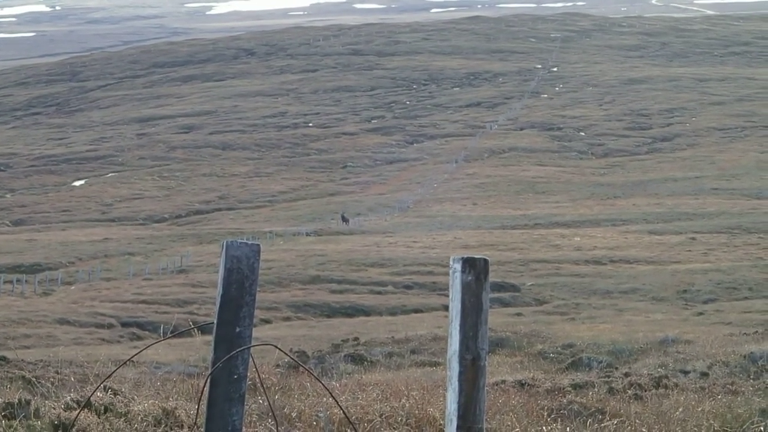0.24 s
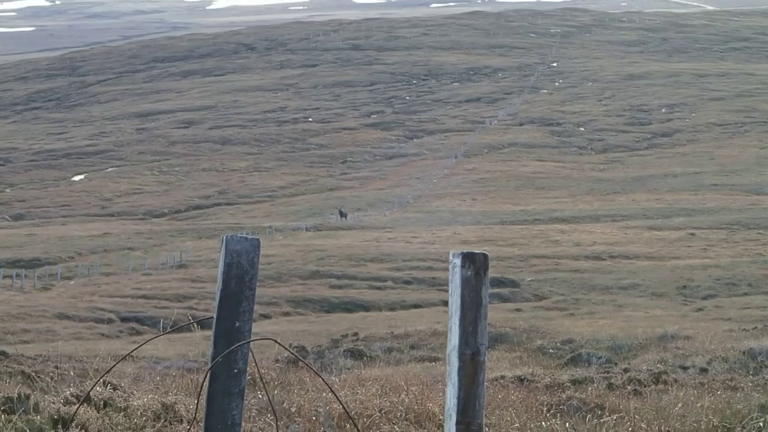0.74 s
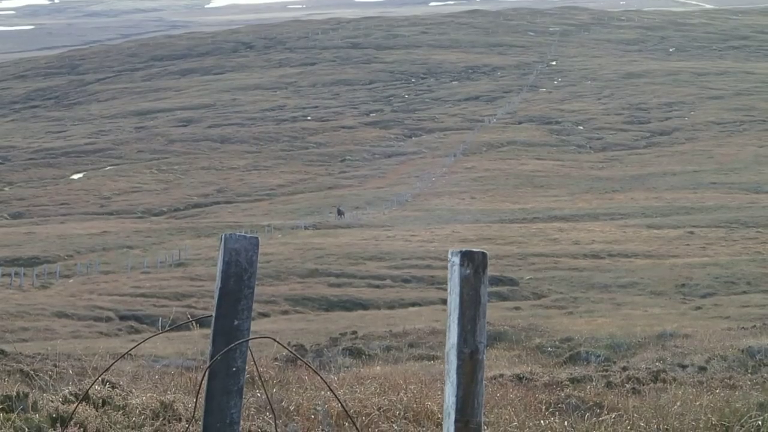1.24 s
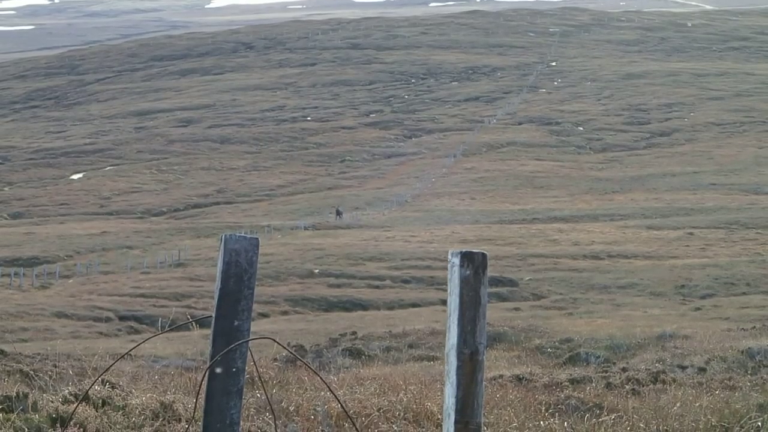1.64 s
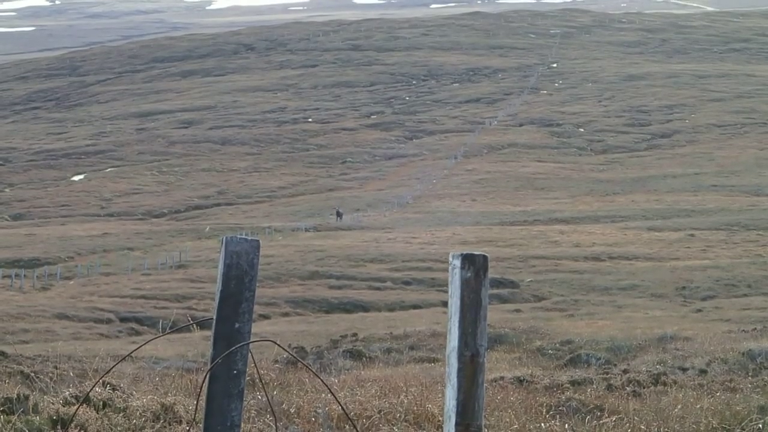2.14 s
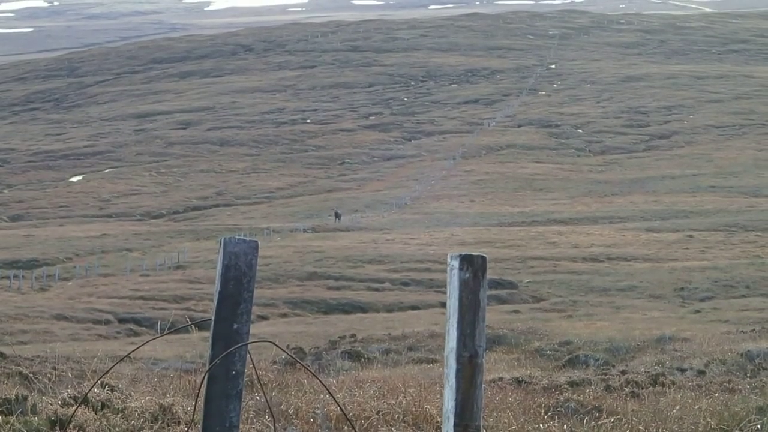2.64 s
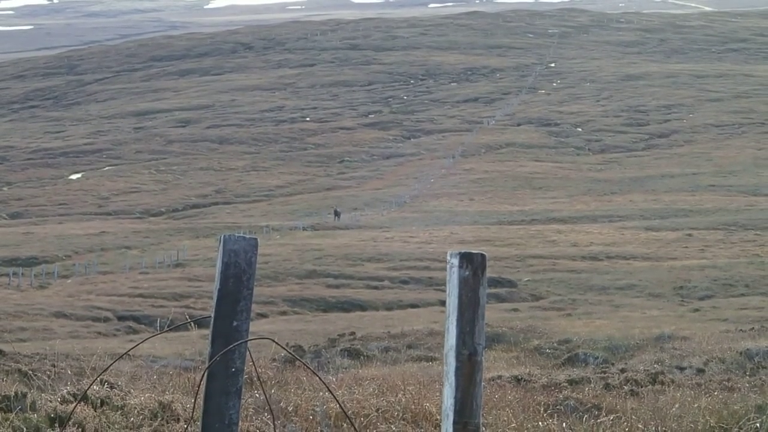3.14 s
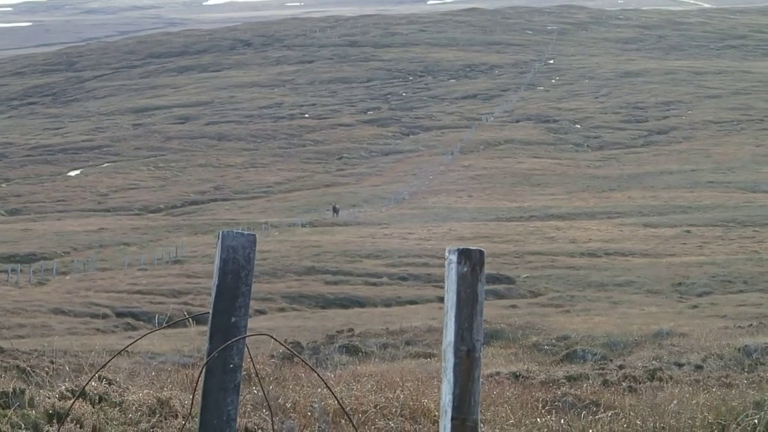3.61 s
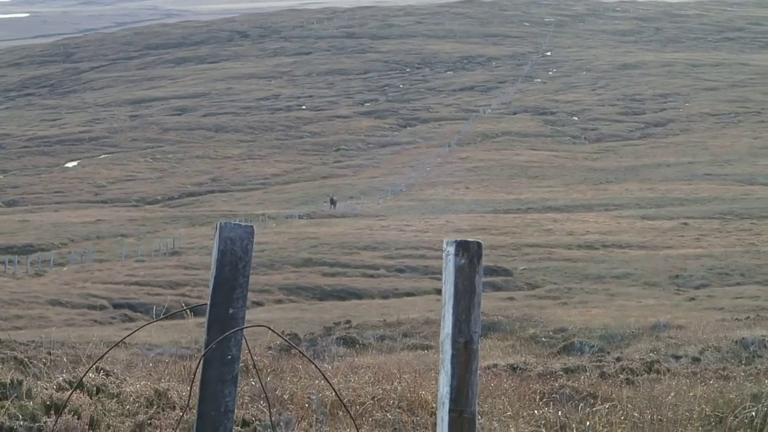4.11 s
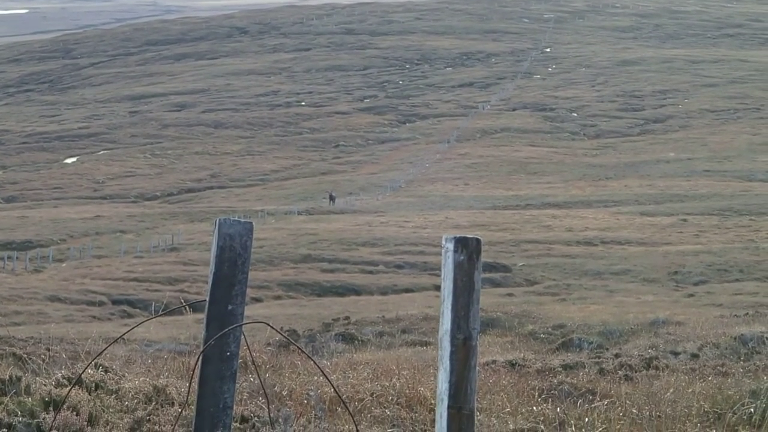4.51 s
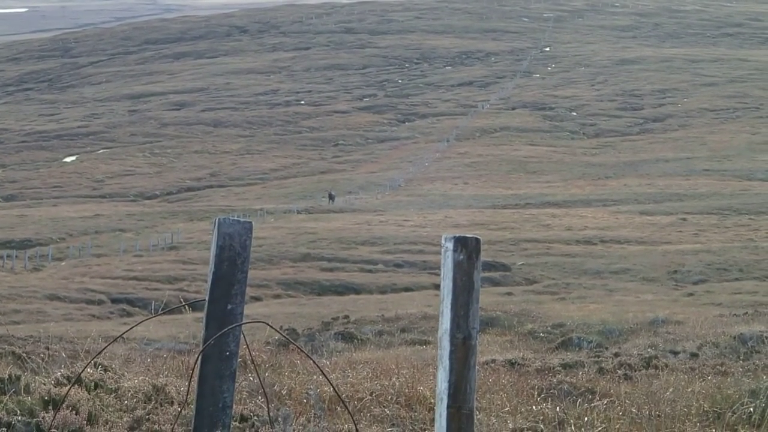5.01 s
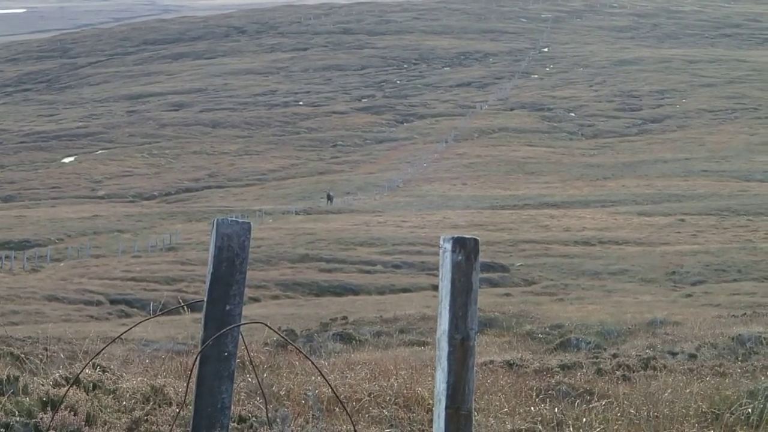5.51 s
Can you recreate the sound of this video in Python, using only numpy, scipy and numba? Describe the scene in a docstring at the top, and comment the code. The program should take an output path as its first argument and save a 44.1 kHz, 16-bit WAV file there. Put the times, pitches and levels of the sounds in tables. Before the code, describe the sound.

A distant red deer stag gives two long, hoarse, hollow roars across open moorland, over steady wide hiss and faint dry-grass rustle.

```python
"""A red deer stag roars far off across open moorland, at once and for 3.7 s, while the larynx slides down.
Three arches of pitch on one breath end as the larynx is let go; a second roar at 4.1 s leaps up, then falls.
Pulses from the vocal folds drive throat resonances; heather scatters the sound, a hillside echoes it faintly.
Throughout lie filtered-noise air and microphone hiss, which flickers, and a dry-grass rustle with four gusts."""
import sys
import numpy as np
from scipy import signal
from scipy.fft import rfft, irfft
from scipy.io import wavfile
from scipy.ndimage import uniform_filter1d
from numba import njit

SR = 44100
rng = np.random.default_rng(int(sys.argv[2]) if len(sys.argv) > 2 else 0)


def to_wav(sig):
    """Store sig (one row per channel, or 1-D mono) as 16-bit WAV at the path in sys.argv[1].

    Samples outside -1..1 are clipped; the rate is SR.
    """
    pcm = np.clip(np.atleast_2d(sig), -1, 1) * 32767
    pcm = np.round(pcm).astype(np.int16)
    wavfile.write(sys.argv[1], SR, pcm.T)  # frames by channels


N = 254016

# The two roars. Each row: start in seconds, end in seconds, effort in dB, extra effort at the outset in dB,
# mouth resonance at the outset in dB, larynx drop in octaves, time of the drop in seconds,
# its abruptness as a power, time of the larynx's release in seconds.
ROARS = [(0, 3.715, -1.13, -4, -1, 0.478, 0.472, 1.47, 0.058),
         (4.126, 5.76, 2.5, -2.4, 9, 0.3804, 0.3, 0.97, 0.27)]
# Vocal-fold pitch in the first roar: three arches on one breath. Each row: time in seconds, pitch in Hz.
FIRST_PITCH = [(0.0, 73.1), (0.07, 71.85), (0.15, 79.2), (0.24, 92.9), (0.27, 95.1), (0.34, 99.4),
               (0.42, 101.6), (0.49, 103.3), (0.58, 112.6), (0.8, 118.6), (0.95, 125.5), (0.99, 126),
               (1.11, 119.4), (1.19, 118.8), (1.29, 109), (1.38, 106.5), (1.51, 106.8), (1.72, 111.4),
               (1.81, 110.7), (1.99, 109.4), (2.14, 113.1), (2.23, 125.8), (2.37, 129.8), (2.62, 129.6),
               (2.68, 121.4), (2.74, 109.4), (3.61, 107), (3.64, 104.5), (3.67, 99.6), (3.72, 86.2)]
# Vocal-fold pitch in the second roar: a leap and a stepwise fall. Each row: time in seconds, pitch in Hz.
SECOND_PITCH = [(4.12, 69.9), (4.156, 89.7), (4.182, 106.0), (4.196, 111.9), (4.242, 117.4), (4.366, 127.1),
                (4.462, 126.8), (4.782, 124.3), (4.942, 120), (5.07, 110.2), (5.224, 108.8), (5.344, 102.2),
                (5.458, 102.1), (5.562, 97.7), (5.76, 95.24)]
# Surges and lulls, each with the mouth reshaped. Each row: time in seconds, half length in seconds,
# effort in dB, mouth resonance in dB, mouth resonance in Hz.
SURGES = [(.17, .07, 3.5, 1, 2100), (.31, 0.038, 3, 3, 1870), (.5, .14, -1.3, 1, 2124),
          (1.0, 0.18, -1, -1.5, 2220), (1.402, 0.13, 0.5, -2.5, 2250), (1.734, .07, 2.5, -0.5, 2070),
          (2.083, 0.042, 1.5, 2.5, 2015), (2.217, .03, 0.5, -4, 2070), (2.451, 0.17, 2.5, .5, 2045),
          (2.691, 0.027, 1, 1.5, 2107), (3.053, 0.4, 2.1, -3, 2060), (3.57, .11, 0.7, 4, 2150),
          (3.69, 0.039, 2.5, 2, 1991), (4.197, .04, 1.5, 1.5, 2010), (4.4, 0.029, 0.5, -1, 2068),
          (4.83, .04, 0, 2, 2263), (5.13, 0.13, 0.2, -3, 2100), (5.46, .1, 0.9, -1.8, 2137),
          (5.681, .12, -1, 4, 2170)]
# The larynx eases up once between two arches. The row: time in seconds, half length in seconds, octaves.
LARYNX_EASE = (1.814, 0.2, 0.089)
# Throat resonances, one list per register (chest, hollow, middle, upper, top). Each row: centre at rest in Hz,
# width of each of two passes in Hz, level within the register in dB, share of the larynx shift followed.
THROAT_MODES = [
    [(539.2, 61, -1.5, 0.65), (706.8, 128.5, 1.5, 0.74)],
    [(977, 74, 4.5, 1.256)],
    [(1330.6, 136.7, -2, 0.46), (1599, 45, -7.5, 1.035)],
    [(1883, 72.7, -0.5, 0.7), (2115.7, 74.6, -10, 0.37), (2374.5, 137, -4, 0.029)],
    [(2702.5, 105, -4, 0.13), (3018, 86, -18.5, -0.026), (3270, 174, -16, -0.12), (3840, 100, -20, 0.018),
     (5900, 1500, -39, 0)],
]
# How each register answers. Each row: base level in dB, dB per dB of effort,
# dB per octave that the larynx stands above rest, dB per dB of mouth resonance.
REGISTERS = [(-32, .7, 4, -0.04), (-30.5, 0.18, -28, -0.56), (-30, 0.51, -20.5, -0.19),
             (-31.5, 1.0, -24, 0.09), (-30, 1.94, -18, -0.6)]
# The voice leans right. Rows: left gain in dB, right gain in dB.
BEARING_DB = [(-0.03,), (2,)]
# Light gusts stir the dry grass. Each row: time in seconds, half length in seconds, rise above the calm in dB.
GUSTS = [(1.101, .4, 6), (2.12, .3, 10.5), (3.5, .35, 9), (4.598, 0.26, 9.5)]
# High rustle spectrum. Each row: frequency in Hz, relative density in dB per Hz.
RUSTLE_SPECTRUM = [(3500, -39), (4900, 4), (5400, 6), (6300, 4), (6700, -37), (10000, -33)]
# Hiss spectrum common to both sides. Each row: frequency in Hz, relative density in dB per Hz.
HISS_MID_SPECTRUM = [(30, -39), (60, -18.5), (110, -7.5), (220, -.5), (450, 1.5), (1000, -1), (2000, -3.5),
                     (3300, -8), (4000, -9.5), (5200, -8.5), (7500, -12), (15500, -14)]
# Hiss spectrum opposed between sides. Each row: frequency in Hz, relative density in dB per Hz.
HISS_SIDE_SPECTRUM = [(30, -41), (60, -23), (110, -10.5), (220, -4), (450, -1.5), (1000, -5), (2000, -7.5),
                      (3300, -10), (4000, -26.5), (5200, -4.5), (7500, -15.5), (15500, -16.5)]

EASY_PITCH_HZ, EFFORT_DB_PER_OCTAVE = 110.83, 8.2   # a harder push is both higher and louder
LARYNX_REST_OCTAVES, LARYNX_RELEASE_OCTAVES = -0.0078, 0.091   # fully retracted; rise as a roar ends
MOUTH_HZ = 2115
CLEAR_ROUGH, ONSET_ROUGH, MAX_ROUGH = 0.0457, 0.025, 0.13   # roughness 0-1: base, added at the outset, ceiling
SLACK_ROUGH_PER_OCTAVE, GLIDE_ROUGH_S = 0.12, 0.016   # below the easy pitch; per octave a second of glide
CALM_RUSTLE_DB = -76
HISS_MID_DB, HISS_SIDE_DB = -54.5, -54.5   # before lean and flicker
HILL_T60_S = 4
CUTOFF_HZ = 15750


def stag(mouth_gain=3.44, mouth_width_hz=126):
    """The folds drive the throat; effort brightens it; the mouth lifts one band and mostly dulls the others."""
    pitch_hz, = in_time([*FIRST_PITCH, *SECOND_PITCH])
    octaves = np.log2(pitch_hz / EASY_PITCH_HZ)
    roaring, roar_db, roar_mouth_db, larynx_octaves, outset = roar_course()
    surge_db, surge_mouth_db, mouth_shift_hz = surges()

    ease_s, ease_half_s, ease_octaves = LARYNX_EASE
    larynx_octaves = larynx_octaves + ease_octaves * bump(ease_s, ease_half_s)
    effort_db = roar_db + surge_db + EFFORT_DB_PER_OCTAVE * octaves
    mouth_db = roar_mouth_db + surge_mouth_db
    register_db = [db + by_effort * effort_db + by_larynx * larynx_octaves + by_mouth * mouth_db
                   for db, by_effort, by_larynx, by_mouth in REGISTERS]

    gate = uniform_filter1d(roaring, size=600)   # samples
    source = gate * vocal_folds(pitch_hz, hoarseness(octaves, outset))
    voice = throat(source, larynx_octaves, register_db)
    mouth = resonance(voice, MOUTH_HZ + mouth_shift_hz, mouth_width_hz)
    return voice + mouth_gain * from_db(mouth_db) * mouth


def roar_course():
    """The larynx slides down, then is let go: gate, effort dB, mouth dB, larynx octaves, outset 0-1."""
    t = np.arange(N) / SR
    course = np.zeros((5, N))
    for start_s, end_s, db, outset_db, mouth_db, drop_octaves, drop_s, power, release_s in ROARS:
        outset = np.exp(-(np.maximum(t - start_s, 0) / drop_s) ** power)
        release = np.exp(-np.maximum(end_s - t, 0) / release_s)
        larynx = LARYNX_REST_OCTAVES + drop_octaves * outset + LARYNX_RELEASE_OCTAVES * release
        roar = [t <= end_s, db + outset_db * outset, mouth_db * outset, larynx, outset]
        course = np.where(t >= start_s, roar, course)
    return course


def surges():
    """Surges and lulls shift effort (dB), mouth resonance (dB) and its centre (Hz)."""
    return sum(np.outer([db, mouth_db, hz - MOUTH_HZ], bump(s, half_s))
               for s, half_s, db, mouth_db, hz in SURGES)


def hoarseness(octaves, outset):
    """The folds run rough when slack, when the pitch slides fast and before the roar has settled."""
    glide = uniform_filter1d(np.abs(np.gradient(octaves)) * SR, size=1500)   # octaves per second
    slack = np.maximum(-octaves, 0)
    rough = CLEAR_ROUGH + SLACK_ROUGH_PER_OCTAVE * slack + GLIDE_ROUGH_S * glide + ONSET_ROUGH * outset
    return np.clip(rough, 0, MAX_ROUGH)


def vocal_folds(pitch_hz, rough, jitter=0.054, waver=0.001, shimmer_db=9):
    """One sharp closure a cycle plus a puff of turbulence; hoarseness unsettles timing and strength."""
    unsteady_hz = pitch_hz * (1 + jitter * rough * drift(48.4) + waver * drift(15.2))
    cycles = np.cumsum(unsteady_hz) / SR
    closed = np.flatnonzero(np.diff(np.floor(cycles)) > 0)
    late = 1 - cycles[closed + 1] % 1 / np.diff(cycles)[closed]   # closures fall between samples
    pulses = np.zeros(N)
    pulses[closed], pulses[closed + 1] = 1 - late, late
    pulses = pulses * np.sqrt(SR / pitch_hz)   # the same power at any pitch
    puffs = rms_one(rng.standard_normal(N) * (1 + np.cos(2 * np.pi * cycles)) ** 2)
    rasp = 0.55 * rough * puffs
    return pulses * from_db(shimmer_db * rough * drift(44)) + rasp


def throat(source, larynx_octaves, register_db, flutter_db=2.02):
    """Steep resonances with dark valleys between; each follows its share of larynx shift and flutters in level."""
    out, sign = 0, 1
    for modes, extra_db in zip(THROAT_MODES, register_db):
        for rest_hz, width_hz, db, share in modes:
            hz = rest_hz * 2 ** (share * larynx_octaves)
            ringing = resonance(resonance(source, hz, width_hz), hz, width_hz)
            level_db = db + extra_db + flutter_db * drift(6)
            out = out + sign * from_db(level_db) * ringing
            sign = -sign   # neighbouring modes of a tube swing in opposite senses at its end
    return out


def dispersed(x, phase_turns=((2150, 420), (2650, 420))):
    """The far path delays the bright bands (centre Hz, width Hz) a little, which blunts each pulse."""
    for hz, width_hz in phase_turns:
        x = x - 2 * resonance(x, np.full(N, hz), width_hz)   # all-pass
    return x


def over_heather(x, low_cut_hz=520, order=12):
    """Grazing over soft ground cancels the low harmonics."""
    return signal.sosfilt(signal.butter(order, low_cut_hz, "high", fs=SR, output="sos"), x)


def moor(voice, near_db=-18, near_t60_s=0.42, far_db=-19.0, far_cut_hz=1300):
    """A short scatter off the heather and a long echo off the hill, dulled by a low-pass."""
    t = np.arange(2 * SR) / SR
    near, far = [rng.standard_normal(len(t)) * from_db(-60 * t / t60_s) for t60_s in (near_t60_s, HILL_T60_S)]
    near = from_db(near_db) * near / np.linalg.norm(near)
    far = from_db(far_db) * far / np.linalg.norm(far)   # level before the low-pass
    dull_far = signal.sosfilt(signal.butter(2, far_cut_hz, fs=SR, output="sos"), far)
    return voice + signal.fftconvolve(voice, near + dull_far)[:N]


def rustle(unsteady_db=3.5):
    """Dry stalks brush together in light air: high noise of unsteady level, raised by gusts."""
    level_db = CALM_RUSTLE_DB + sum(db * bump(s, half_s) for s, half_s, db in GUSTS)
    return from_db(level_db + unsteady_db * drift(32)) * coloured_noise(RUSTLE_SPECTRUM)


def hiss():
    """Steady air and microphone noise from independent mid and side parts, so it sounds wide."""
    mid = from_db(HISS_MID_DB) * coloured_noise(HISS_MID_SPECTRUM)
    side = from_db(HISS_SIDE_DB) * coloured_noise(HISS_SIDE_SPECTRUM)
    return np.array([mid + side, mid - side])


def flicker(depth_db=1.26, duty=0.14, rate_hz=29.97):
    """Gain of slight, brief, regular swells in the hiss; its mean in dB is about zero."""
    swell = 1.0 * ((np.arange(N) / SR * rate_hz - 0.45) % 1 < duty)
    return from_db(depth_db * (swell - duty))


def from_db(db):
    """Decibels to gain."""
    return 10 ** (np.asarray(db) / 20)


def rms_one(x):
    """Scale to unit power."""
    return x / np.sqrt(np.mean(x ** 2) + 1e-20)


def in_time(rows):
    """Each column of a curve at every sample."""
    s, *columns = np.transpose(rows)
    return [np.interp(np.arange(N) / SR, s, c) for c in columns]


def bump(s, half_length_s):
    """A Gaussian swell of height 1 at time s, down to 1/e after half_length_s."""
    return np.exp(-((np.arange(N) / SR - s) / half_length_s) ** 2)


def drift(rate_hz):
    """Smooth random wander, mostly below about rate_hz; rms 1."""
    hz = np.arange(N // 2 + 1) * SR / N
    return rms_one(irfft(rfft(rng.standard_normal(N)) / (1 + (hz / rate_hz) ** 2), N))


def coloured_noise(spectrum):
    """Steady noise with the given spectrum, cut at CUTOFF_HZ; rms 1."""
    hz = np.arange(N // 2 + 1) * SR / N
    points_hz, db = np.transpose(spectrum)
    gain = from_db(np.interp(np.log(hz + 1), np.log(points_hz), db))
    return rms_one(irfft(rfft(rng.standard_normal(N)) * gain * (hz < CUTOFF_HZ), N))


@njit
def resonate(x, turn, r):
    """Two-pole resonance whose centre moves (radians per sample); gain about 1 on top."""
    y = np.zeros(len(x))
    for i in range(2, len(x)):
        drive = (1 - r * r) / 2 * (x[i] - x[i - 2])
        y[i] = drive + 2 * r * np.cos(turn[i]) * y[i - 1] - r * r * y[i - 2]
    return y


def resonance(x, hz, width_hz):
    """Pass x through one resonance that follows the curve hz; the pole radius sets its width."""
    return resonate(x, 2 * np.pi * hz / SR, np.exp(-np.pi * width_hz / SR))


def scene(voice_db=-0.98, hiss_lean_db=0.44):
    """The distant stag a little to the right, over wide hiss and a faint central rustle."""
    voice = moor(over_heather(dispersed(stag())))
    roars = from_db(voice_db) * voice * from_db(BEARING_DB)
    lean = from_db([[-hiss_lean_db], [hiss_lean_db]])   # left, right
    return roars + rustle() + hiss() * flicker() * lean


def record(dry, notch_hz=4100, notch_width_hz=450):
    """The microphone pair has a narrow dip in its common signal; the top is cut."""
    mid, side = (dry[0] + dry[1]) / 2, (dry[0] - dry[1]) / 2
    mid = signal.lfilter(*signal.iirnotch(notch_hz, notch_hz / notch_width_hz, fs=SR), mid)
    low_pass = signal.ellip(12, 0.1, 80, CUTOFF_HZ, fs=SR, output="sos")   # ripple dB, stopband dB
    return signal.sosfilt(low_pass, np.array([mid + side, mid - side]))


dry = scene()
out = record(dry)
to_wav(out)
```